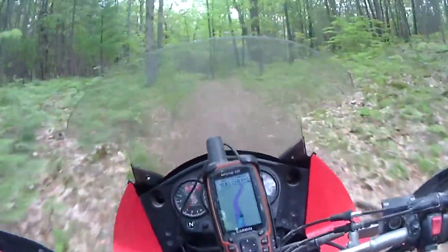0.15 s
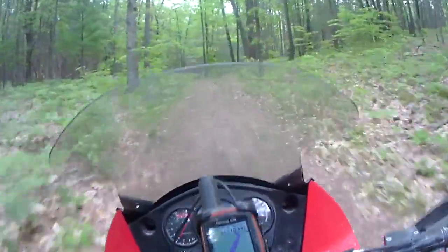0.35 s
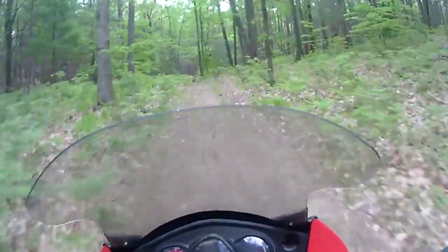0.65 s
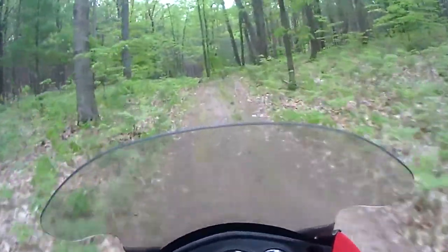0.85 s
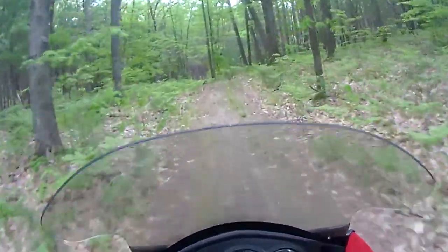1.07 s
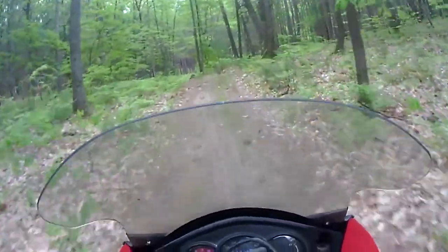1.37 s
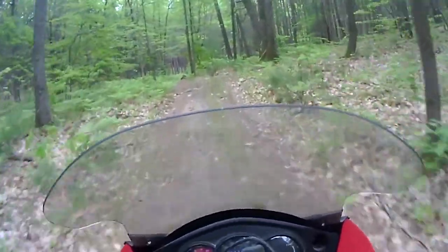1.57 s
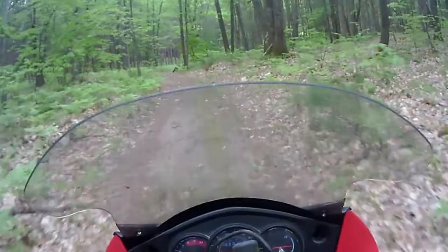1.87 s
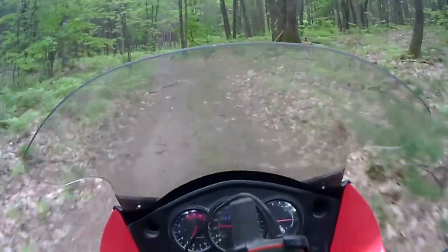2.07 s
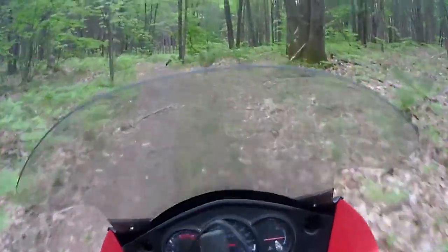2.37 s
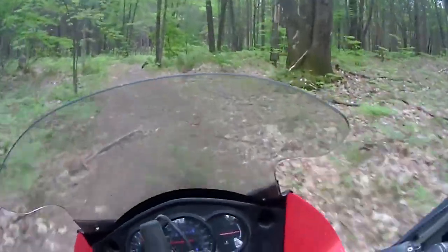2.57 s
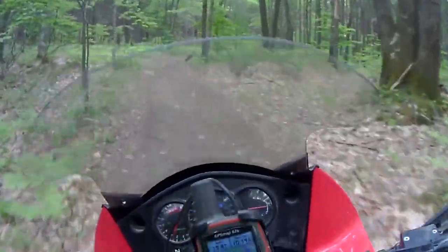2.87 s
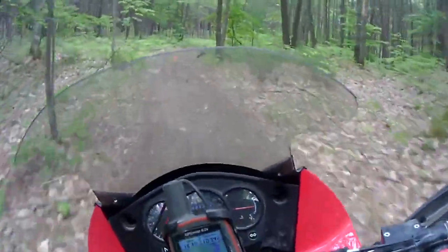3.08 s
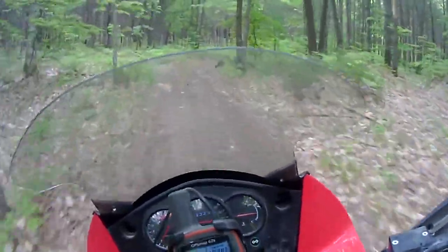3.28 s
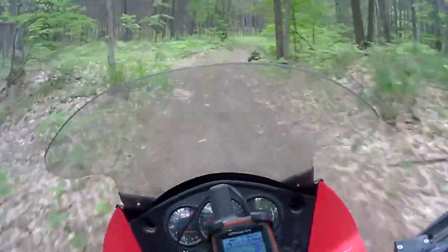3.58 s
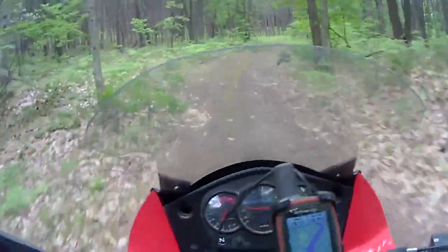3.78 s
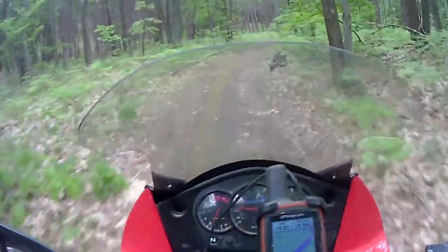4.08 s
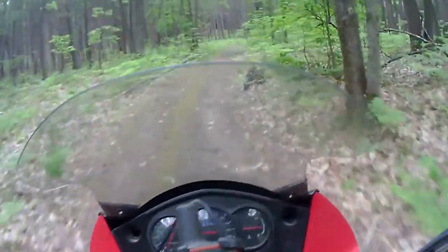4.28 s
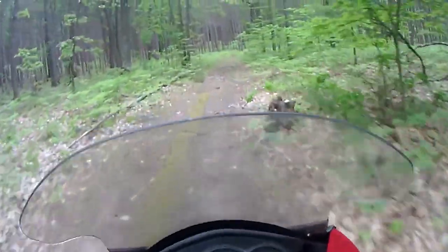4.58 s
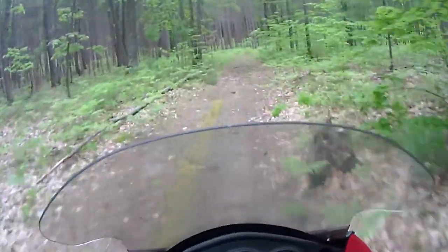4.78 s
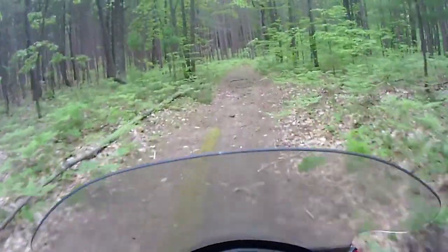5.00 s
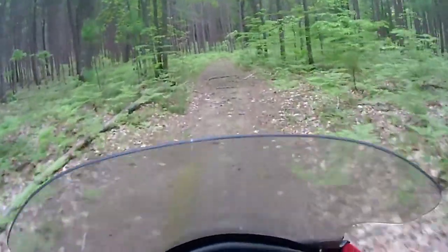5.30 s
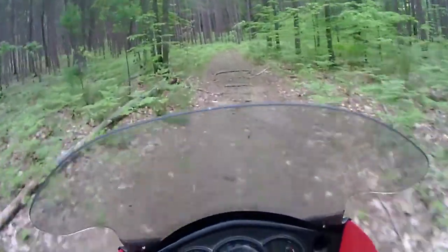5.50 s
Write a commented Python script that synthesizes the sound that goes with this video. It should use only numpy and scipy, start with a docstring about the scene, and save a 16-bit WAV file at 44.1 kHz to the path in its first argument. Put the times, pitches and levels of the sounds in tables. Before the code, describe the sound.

Violent wind roars and distorts the microphone while a single-cylinder motorcycle chugs along a forest trail, pulling harder mid-way, then easing off.

```python
"""Roaring gusts come first, so strong that they overload a microphone on a rider and choke the other sounds.
Under them a single-cylinder four-stroke motorcycle chugs along a forest trail: each firing is an impulse
that excites resonances of exhaust and pipe, and the valve gear knocks on the case.
Opening the throttle adds rasp, rattle and gas hiss; the gears whine most at half throttle.
Wind is coloured noise under a level curve, joined by single eddies and pressure fronts; air and leaves hiss."""
import sys
import numpy as np
from scipy import signal
from scipy.fft import rfft, irfft
from scipy.io import wavfile
from scipy.ndimage import uniform_filter1d

SR = 44100
rng = np.random.default_rng(int(sys.argv[2]) if len(sys.argv) > 2 else 0)


def master(y):
    """Save y as 16-bit WAV."""
    cut = np.clip(np.atleast_2d(y).T, -1, 1)
    pcm = np.round(cut * 32767)  # scale
    wavfile.write(sys.argv[1], SR, pcm.astype(np.int16))


N = 249165
TIME = np.arange(N) / SR  # s


def undb(db):
    """Logarithmic level: decibels to amplitude gain."""
    return 10 ** (np.asarray(db) / 20)


def unit(x):
    """Normalization: scale to rms 1."""
    return x / np.sqrt(np.mean(x ** 2))


def curves(table):
    """Linear interpolation: the columns of a table, joined by straight lines in time."""
    s, *columns = np.transpose(table)
    return [np.interp(TIME, s, column) for column in columns]


def noise(colour):
    """Spectral shaping: white noise weighted in frequency by (Hz, dB) points, at rms 1."""
    hz, db = np.transpose(colour)
    bins_hz = np.maximum(np.arange(N // 2 + 1) * SR / N, 1)
    gain = undb(np.interp(np.log(bins_hz), np.log(hz), db))
    spectrum = rfft(rng.standard_normal(N))
    return unit(irfft(spectrum * gain, N))


def walk(rate):
    """Slow random fluctuation: rms 1, with a new random target rate times a second."""
    knots = rng.standard_normal(4096)
    return unit(np.interp(TIME * rate, np.arange(len(knots)), knots))


def steady(x, seconds):
    """Envelope flattening: divide a noise by its running rms, so that a control sets its strength."""
    size = max(int(seconds * SR), 2)
    power = uniform_filter1d(uniform_filter1d(x ** 2, size), size)
    return x / np.sqrt(power)


def ring(x, modes):
    """Modal resonance: drive a parallel bank of (Hz, width Hz, dB) resonators."""
    return sum(undb(db) * signal.lfilter(*signal.iirpeak(hz, hz / width, fs=SR), x) for hz, width, db in modes)


def ring_twice(x, hz, width):
    """Cascaded resonance: two equal resonators in a row give a rounder attack and steeper skirts."""
    mode = [(hz, width, 0)]
    return ring(ring(x, mode), mode)


def strikes(cycle, angle, scatter_db):
    """Periodic excitation: an impulse of uneven size whenever the engine passes a share of its cycle."""
    at = np.flatnonzero(np.diff(np.floor(cycle - angle)) > 0)
    out = np.zeros(N)
    out[at] = undb(scatter_db * rng.standard_normal(256)[:len(at)])
    return out


def puff(pulses, seconds):
    """Critically damped response: each impulse swells for the given time, then dies; rms 1."""
    pole = np.exp(-1 / (seconds * SR))
    return unit(signal.lfilter([1], [1, -2 * pole, pole ** 2], pulses))


def burst(s, seconds):
    """Exponential decay: an envelope that starts at once and dies away."""
    return (TIME >= s) * np.exp(-np.abs(TIME - s) / seconds)


def hump(s, length):
    """Gaussian pulse: a smooth swell around a moment, of the given length between its 1/e points."""
    return np.exp(-(2 * (TIME - s) / length) ** 2)


# strength of the airstream on the microphone: [t/s, relative level/dB]
AIRSTREAM = [(0, -3), (.27, -7.5), (.32, -15.5), (.37, -7.5), (.6, -4.5), (.8, -14.5), (1.0, -23.5),
             (1.28, -23), (1.58, -20.5), (1.75, -25), (2.0, -16), (2.27, -12), (2.36, -17), (2.43, -7.5),
             (2.72, -17.5), (2.88, -8), (3.5, -9.5), (3.72, -7.5), (3.9, -9), (4.27, -7.5), (4.5, -10),
             (4.72, -22), (5.15, -28.5), (5.65, -31)]
# brief lulls between the thumps of the wind: [t/s, length/s, dip/dB]
LULLS = [(0.106, .03, -11), (0.416, 0.03, -7), (0.491, 0.032, -11), (.79, 0.055, -6.5), (1.104, 0.023, -12),
         (2.612, 0.021, -10), (3.819, 0.02, -1), (4.059, 0.012, -11), (4.506, 0.023, -2), (4.536, .035, -8)]
# single gusts on top of the airstream: [t/s, length/s, relative level/dB]
GUSTS = [(0.385, 0.034, -9), (0.749, 0.018, -3), (1.274, 0.036, -14), (1.328, 0.024, -24),
         (1.416, 0.018, -10), (1.64, 0.03, -15), (1.723, 0.042, -13), (1.764, 0.015, -4.5),
         (1.828, 0.0061, -1.5), (1.87, 0.012, -15), (1.922, 0.023, -5.5), (2.107, 0.016, -11),
         (2.281, 0.015, -2), (2.48, 0.065, -21), (2.653, 0.042, -14), (4.62, 0.033, -11.5),
         (4.938, 0.044, -18), (5.586, 0.025, -17)]


def buffeting():
    """Amplitude superposition: a randomly wavering airstream with lulls, plus single gusts; returns dB."""
    stream_db, = curves(AIRSTREAM)
    lull_db = sum(db * hump(s, length) for s, length, db in LULLS)
    chance_db = 2 * walk(rate=14)
    stream = undb(stream_db + lull_db + chance_db)
    gusts = sum(undb(db) * hump(s, length) for s, length, db in GUSTS)
    return 20 * np.log10(stream + gusts)


# spectrum of the large eddies: [f/Hz, relative level per Hz/dB]
BUFFET_COLOUR = [(12, -53), (24, -3), (48, 2.5), (75, -0.5), (130, -4.5), (220, -9.5), (400, -29.5),
                 (900, -72), (3000, -80)]
# spectrum of the smaller eddies: [f/Hz, relative level per Hz/dB]
EDDY_COLOUR = [(60, -33), (150, -0.5), (240, -2), (340, -4), (550, -15), (900, -29.5), (2000, -25.5),
               (5000, -64)]


def wind(buffet_db):
    """Turbulent pressure: large eddies off the windscreen push; smaller ones flutter on top in flurries."""
    buffet = steady(noise(BUFFET_COLOUR), seconds=.035)
    flurries = undb(3 * walk(rate=60))
    eddies = unit(steady(noise(EDDY_COLOUR), seconds=.035) * flurries)
    return undb(buffet_db) * (undb(0.64) * buffet + undb(-10.0) * eddies)


# spectrum of the hiss of air and dry leaves: [f/Hz, relative level per Hz/dB]
RUSH_COLOUR = [(100, 14.5), (450, 12.5), (900, 11.5), (1200, 5), (1800, 6), (2300, 2), (3200, 4),
               (4700, 1.5), (5600, 4), (6300, -1), (7000, -1), (8400, -1.5), (9100, 6), (10000, -10.5)]


def rush(throttle, buffet_db):
    """Broadband flow noise: air and dry leaves hiss, louder with throttle and in the gusts."""
    gust_gain = 1 + 0.17 * undb(buffet_db)
    level_db = -24 + 4.5 * throttle + 0.78 * walk(rate=79)
    return noise(RUSH_COLOUR) * gust_gain * undb(level_db)


# low throbs of air shed by the windscreen: [t/s, length/s, mean eddy rate f/Hz, level/dB]
THROBS = [(0.838, .04, 150, -17), (1.172, 0.04, 90, -16), (1.689, 0.04, 100, -13.5),
          (2.13, 0.12, 74.66, -12), (2.243, 0.093, 129.4, -8.5), (2.415, .06, 72, -6.5),
          (2.8, 0.097, 70, -14), (2.972, .09, 135.4, -11), (3.122, 0.052, 118, -11),
          (3.198, 0.053, 195, -12), (3.361, 0.09, 95, -9), (3.487, 0.056, 85, -7.5), (3.662, 0.056, 80, -9),
          (3.73, 0.083, 165.1, -12), (3.86, 0.042, 128, -9.5)]


def throbs():
    """Periodic vortex shedding: eddies fall into step as a short, low tone of wandering pitch."""
    pitch_wander = 0.17  # rms share of the eddy rate
    drift = TIME + np.cumsum(pitch_wander * walk(rate=50)) / SR
    out = np.zeros(N)
    for s, length, hz, db in THROBS:
        phase = 2 * np.pi * (hz * drift + rng.random())
        out += undb(db) * hump(s, length) * np.sqrt(2) * np.sin(phase)
    return out


# blasts of air squarely on the microphone: [t/s, length/s, eddy rate f/Hz, level/dB]
BLASTS = [(0.027, 0.038, 353, -3.5), (0.092, 0.023, 261, -8.5), (0.134, 0.023, 290, -6.5),
          (0.177, 0.021, 380, -9), (.218, 0.042, 258, -5), (.256, 0.027, 450, -4.5),
          (0.282, 0.036, 414, -9), (0.446, 0.11, 290, -9.5), (0.563, 0.043, 206, -6),
          (1.277, .025, 350, -20), (1.543, 0.057, 368, -20.5), (1.775, 0.02, 280, -14),
          (1.867, 0.014, 292, -16), (2.281, 0.019, 273, -19), (3.534, 0.038, 227, -10.5),
          (3.877, 0.025, 290, -18), (3.935, 0.041, 210, -3), (4.007, 0.042, 257, -6),
          (4.068, 0.037, 194, -11), (4.125, 0.07, 256, -9.5), (4.197, 0.046, 214, -2),
          (4.316, .016, 280, -17), (4.445, 0.021, 275, -9.5)]


def blasts():
    """Loose vortex shedding: fast air roars as noise in a broad resonance around the eddy rate."""
    air = rng.standard_normal(N)
    roars = np.zeros(N)
    for s, length, hz, db in BLASTS:
        eddies = steady(ring_twice(air, hz, hz * 0.87), seconds=0.088)
        roars += undb(db) * hump(s, length) * eddies
    return roars


# single shoves of air on the microphone: [t/s, length/s, signed relative pressure]
SHOVES = [(0.333, .008, 0.062), (0.342, 0.0052, -2.7), (0.346, 0.008, 1.9), (3.495, 0.01, 1.47),
          (4.261, 0.007, 2.4), (4.27, 0.01, -1.9), (4.335, 0.009, -0.91)]


def shoves():
    """Quasi-static pressure: smooth humps, most of them larger than the microphone can follow."""
    return sum(pressure * hump(s, length) for s, length, pressure in SHOVES)


# steep pressure fronts: [t/s, signed relative pressure]
SLAMS = [(0.019, -1), (0.03, -0.5), (.126, 2.5), (0.175, -2), (0.214, 0.5), (0.239, -0.3), (0.264, -1.5),
         (0.282, 0), (0.296, 1), (0.343, 0), (0.443, 1), (0.516, 1), (0.602, 1.5), (3.938, 3.5),
         (4.01, 0.5), (4.033, -1), (4.082, 2.2), (4.14, 2.5), (4.178, -0.5), (4.202, 0.1), (4.221, 1.5)]


def slams():
    """Steep wavefront: the pressure flips sign in about a millisecond, a crack in the roar."""
    front_s, length_s = .0006, .003
    return sum(pressure * np.tanh((TIME - s) / front_s) * hump(s, 2 * length_s) for s, pressure in SLAMS)


# bumps in the trail that shake the fairing: [t/s, level/dB]
BUMPS = [(1.938, -21), (3.732, -15), (4.772, -21), (5.487, -22)]
# crankcase and fairing resonances: [f/Hz, width/Hz, relative level/dB]
CASE_MODES = [(593, 25, 15), (691, 71, 12.5), (799, 66, 10), (847, 50, -4), (1300, 180, -2),
              (1750, 110, -17.5)]


def trail():
    """Impact excitation: bumps make the fairing resonances clack, and a twig snaps under a tyre."""
    shaking = sum(undb(db) * burst(s, seconds=.006) for s, db in BUMPS)
    clacks = shaking * unit(ring(rng.standard_normal(N), CASE_MODES))
    snap = undb(-21) * burst(3.699, seconds=.01)
    return clacks + snap * unit(ring(rng.standard_normal(N), [(3900, 1200, 0)]))


def rattle(throttle):
    """Random impacts: hard pulling shakes loose parts into a dense patter of small ticks."""
    ticks_per_s = 190
    ticks = 1. * (rng.random(N) < ticks_per_s / SR)
    grains = puff(ticks, seconds=.0005) * rng.standard_normal(N)
    patter = unit(ring(grains, [(1220, 530, 2.5), (2240, 370, -6.0), (5240, 1300, -10.0)]))
    return undb(-28) * throttle ** 3 * patter


# gear whine: [cycles per firing, relative level/dB]
GEAR_ORDERS = [(32, -36), (40, -33.5), (41, -41)]


def whine(shaft, throttle):
    """Gear-mesh orders: tones locked to the shaft waver as the chain tugs, strongest at half throttle."""
    lines = np.zeros(N)
    for order, db in GEAR_ORDERS:
        level = undb(db + 2 * walk(rate=5))
        phase = 2 * np.pi * order * shaft + .4 * walk(rate=60)
        lines += level * np.sin(phase)
    return undb(-1) * np.sin(np.pi * throttle) ** 2 * lines


def shake(shaft, throttle):
    """Rotating imbalance: the crank hums low, two turns to a firing, stronger under load."""
    return undb(-23) * 2 * throttle * np.sin(4 * np.pi * shaft)


# hard metallic pings of the engine under load: [t/s, level/dB]
PINGS = [(2.772, -15), (2.86, -15), (2.946, -15), (3.037, -10), (3.084, -11), (3.181, -13), (3.249, -8.5),
         (3.296, -14), (3.462, -14)]


def pings():
    """Impulsive ringing: very short bursts of noise in two metallic resonances, at listed moments."""
    blows = sum(undb(db) * burst(s, seconds=.002) for s, db in PINGS)
    return blows * unit(ring(rng.standard_normal(N), [(2520, 910, -1), (4950, 530, -5)]))


# knocks of piston and valves: [share of the engine cycle, relative level/dB]
KNOCKS = [(.05, 3), (.34, .5), (.59, -1.5), (.73, 2), (.82, -1), (.96, -1.5)]


def clatter(cycle):
    """Structure-borne impact: piston and valves knock on the case at fixed angles, each with a short rattle."""
    knocks = sum(undb(db) * strikes(cycle, angle, scatter_db=2) for angle, db in KNOCKS)
    chatter = puff(knocks, seconds=.002) * rng.standard_normal(N)
    blows = unit(knocks) + undb(-3) * chatter
    # the small case radiates little bass
    highpass = signal.butter(3, 480, "highpass", fs=SR, output="sos")
    return unit(signal.sosfilt(highpass, ring(blows, CASE_MODES)))


# sharp strokes of the engine under load: [share of the engine cycle, relative level/dB]
STROKES = [(.11, 0), (.2, -1), (.36, -2), (.45, -3), (.64, -8), (.88, -6)]
# spectrum of the rasp: [f/Hz, relative level per Hz/dB]
RASP_COLOUR = [(200, 10), (700, -7.5), (1300, -3.5), (2600, -2.5), (4000, -13.5), (6000, -8.5),
               (10000, -18.5)]


def rasp(cycle):
    """Amplitude-modulated noise: quick cracks each cycle, and air tearing through the open throttle."""
    strokes = sum(undb(db) * strikes(cycle, angle, scatter_db=1.5) for angle, db in STROKES)
    cracks = puff(strokes, seconds=.0007)
    tear = puff(strikes(cycle, .17, scatter_db=1), seconds=.0035)
    grit = noise(RASP_COLOUR) * undb(2.8 * walk(rate=830))
    return unit(cracks + .5 * tear) * unit(grit)


# spectrum of the hiss of spent gas: [f/Hz, relative level per Hz/dB]
BLOW_COLOUR = [(500, -19), (2000, 5), (4000, 5.5), (6000, -1), (9000, 11.5), (11000, -11)]


def blowdown(cycle):
    """Monopole outflow: spent gas leaves in a slow push of pressure with a puff of hiss."""
    push = puff(strikes(cycle, -.24, scatter_db=2), seconds=.006)
    hiss = puff(strikes(cycle, -.17, scatter_db=1), seconds=.004)
    return undb(-27) * (push - push.mean()) + undb(-28) * hiss * noise(BLOW_COLOUR)


# the hollow ring of the pipe: [f/Hz, width of each of two stages/Hz, relative level/dB]
PIPE_MODES = [(104.7, 29, -3.5), (310.8, 40, -1)]
# strength of the hollow note: [t/s, level/dB]
PIPE_LEVEL = [(0, -28), (.9, -25), (2.0, -24.5), (3.0, -26), (4.4, -27), (4.85, -24), (5.05, -20.5),
              (5.3, -20.5), (5.65, -23)]


def pipe(cycle):
    """Air-column resonance: a hollow note throbs once a cycle; gas flow roughens it and bends its pitch."""
    beats = strikes(cycle, .02, scatter_db=1.5)
    note = sum(undb(db) * ring_twice(beats, hz, width) for hz, width, db in PIPE_MODES)
    gas = ring_twice(puff(beats, seconds=.008) * rng.standard_normal(N), 201, 67)
    # a varying delay bends the pitch
    wandering = np.interp(TIME + .0003 * walk(rate=25), TIME, note)
    level_db, = curves(PIPE_LEVEL)
    return undb(level_db) * (unit(wandering) + undb(-11) * unit(gas))


# exhaust pipe and air box resonances, relative levels:
# [f/Hz, width of each of two stages/Hz, level with shut throttle/dB, rise to full throttle/dB]
EXHAUST_MODES = [(76.4, 41.4, -2, 15.5), (130.2, 39, -7, 18.5), (206, 123, -12, 16.5),
                 (481, 210, -24.5, 23.5)]


def exhaust(firings, throttle):
    """Impulse-driven resonance: firings bark in pipe and air box; turbulent gas varies every thump."""
    gas = puff(firings, seconds=0.0022) * rng.standard_normal(N)
    push = unit(firings) + undb(-11) * gas
    bark = np.zeros(N)
    for hz, width, db, rise_db in EXHAUST_MODES:
        # two chambers in a row: a round attack and dark valleys between the resonances
        bark += undb(db + rise_db * throttle) * ring_twice(push, hz, width)
    return unit(bark)


# engine speed: [t/s, firing rate f/Hz]
REVS = [(0.0, 22.79), (0.4, 22.1), (0.8, 21.85), (1.1, 21.91), (1.4, 22.02), (1.8, 21.08), (2.2, 20.91),
        (2.5, 20.82), (2.85, 21.89), (3.15, 23.73), (3.5, 23.22), (3.9, 21.16), (4.3, 20.8), (4.6, 19.7),
        (4.9, 19.94), (5.2, 19.81), (5.45, 21.39), (5.65, 20.02)]


def engine(throttle):
    """Common periodic drive: one slightly unsteady firing a cycle times the engine; throttle sets the mix."""
    firing_hz, = curves(REVS)
    shaft = .24 + np.cumsum(firing_hz) / SR
    cycle = shaft + .002 * walk(rate=40)  # timing jitter, in cycles
    firings = strikes(cycle, .04, scatter_db=1.5)
    return (rattle(throttle) + whine(shaft, throttle) + shake(shaft, throttle)
            + undb(-27.5 - 2 * throttle) * clatter(cycle)
            + undb(-49.5 + 36.5 * throttle) * rasp(cycle)
            + throttle * blowdown(cycle)
            + pipe(cycle)
            + undb(-20) * exhaust(firings, throttle))


# the rider's hand: [t/s, throttle opening 0-1]
THROTTLE = [(0, 0.6), (.28, 0.46), (.55, 0.26), (.8, 0.45), (1.07, 0.5), (1.75, 0.57), (2.0, 0.43),
            (2.23, 0.27), (2.5, 0.42), (2.72, 0.78), (3.1, 0.84), (3.53, 0.73), (3.76, 0.05), (4.27, 0),
            (4.48, 0.2), (5.18, 0.04), (5.65, 0.5)]


def scene():
    """Linear superposition: wind, rush, trail and engine add up at the microphone."""
    throttle, = curves(THROTTLE)
    buffet_db = buffeting()
    air = wind(buffet_db) + rush(throttle, buffet_db) + throbs() + blasts() + shoves() + slams()
    bike = trail() + pings() + engine(throttle)
    fade_in = np.minimum(TIME / .002, 1)
    return ((air + bike) * fade_in)[None]


def record(dry):
    """Saturation and band limiting: gusts flatten and choke most of the treble; a band and the top are cut."""
    highpass = signal.butter(2, 1900, "highpass", fs=SR, output="sos")
    spared = undb(-10.0) * signal.sosfilt(highpass, dry)  # a little treble escapes the overload
    driven = dry - spared
    limit, knee = 0.54, 6  # largest swing of the driven part; sharpness of the bend
    flattened = driven / (1 + np.abs(driven / limit) ** knee) ** (1 / knee) + spared
    notch = signal.butter(3, (7250, 8400), "bandstop", fs=SR, output="sos")
    top_cut = signal.ellip(12, .2, 80, 9650, fs=SR, output="sos")
    return signal.sosfilt(top_cut, signal.sosfilt(notch, flattened))


dry = scene()
out = record(dry)
master(out)
```